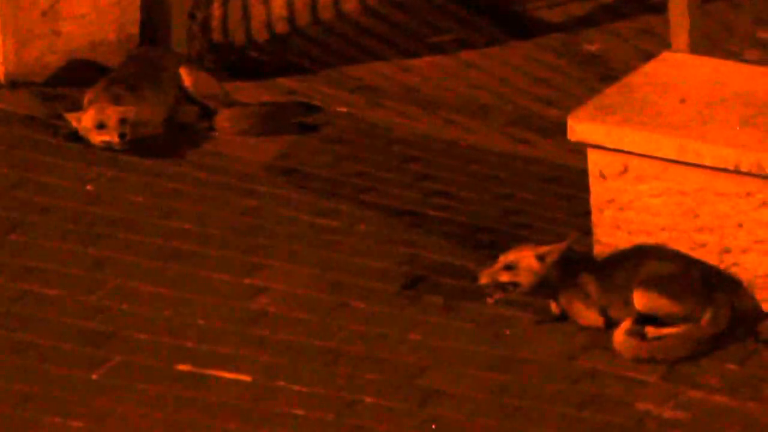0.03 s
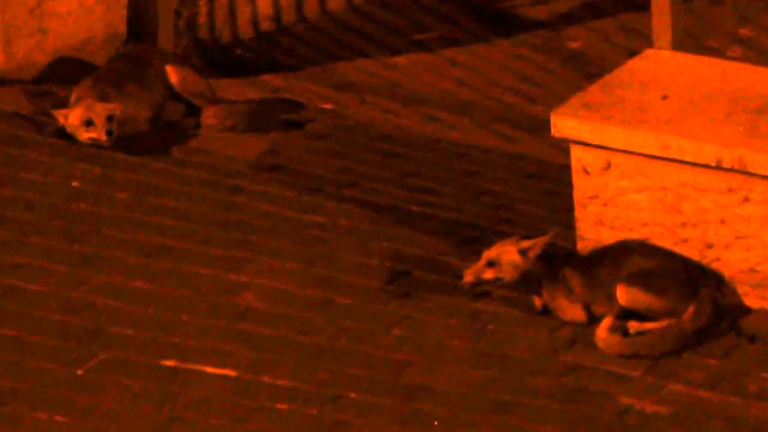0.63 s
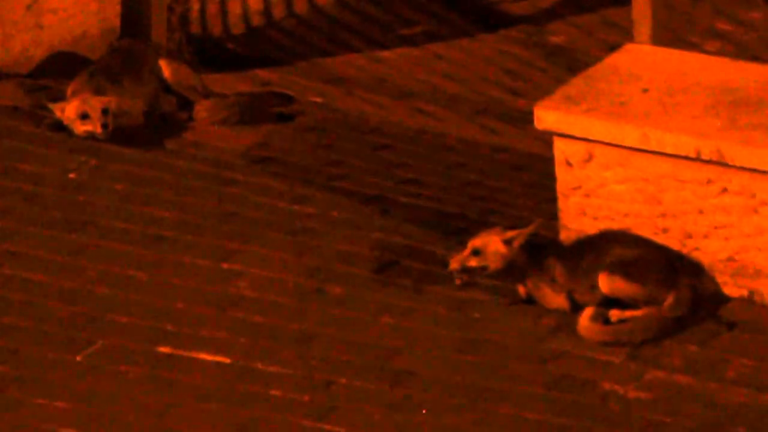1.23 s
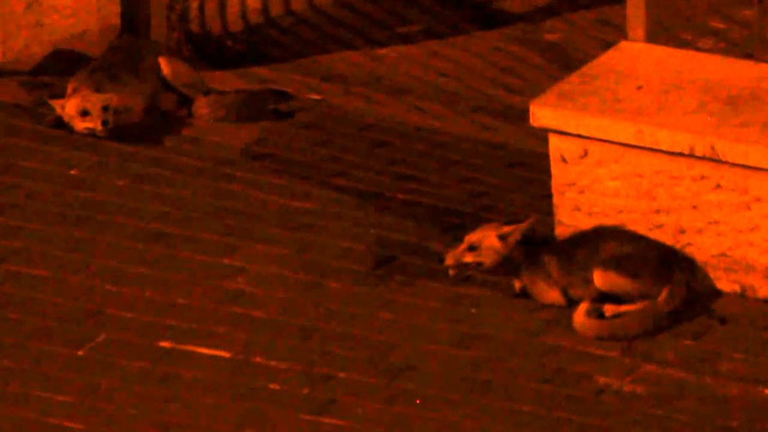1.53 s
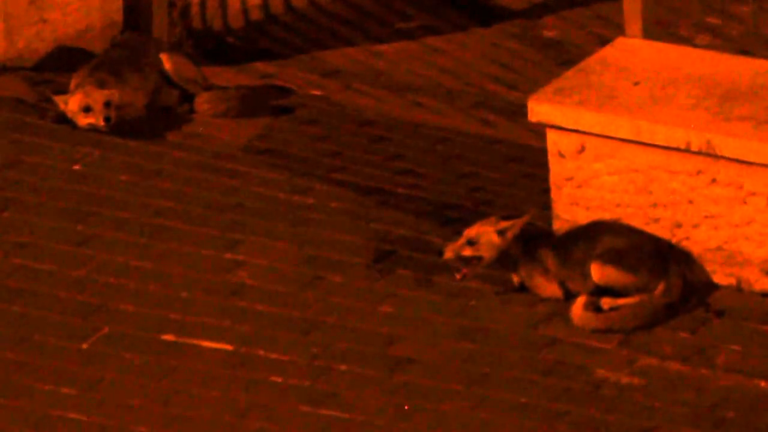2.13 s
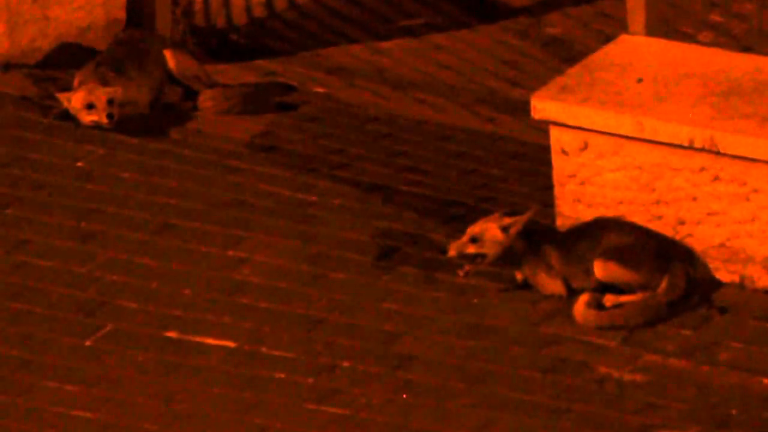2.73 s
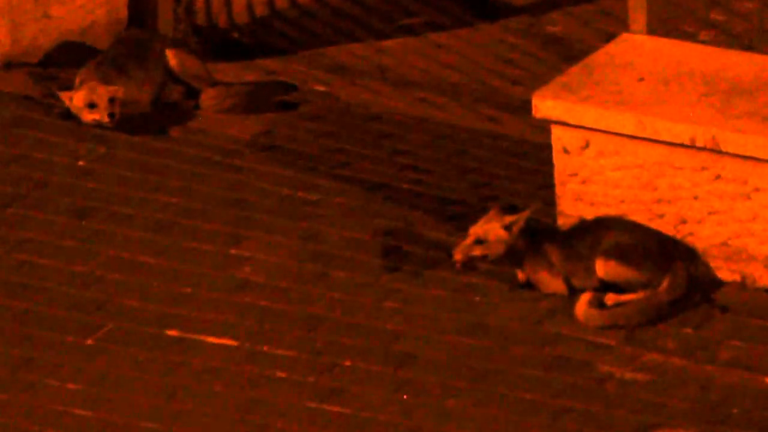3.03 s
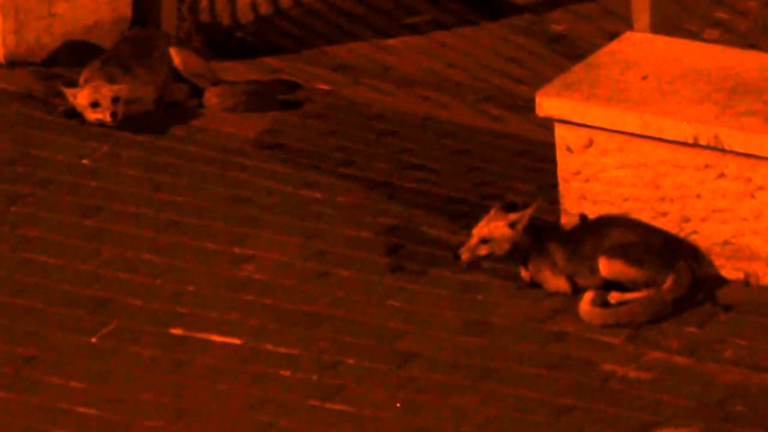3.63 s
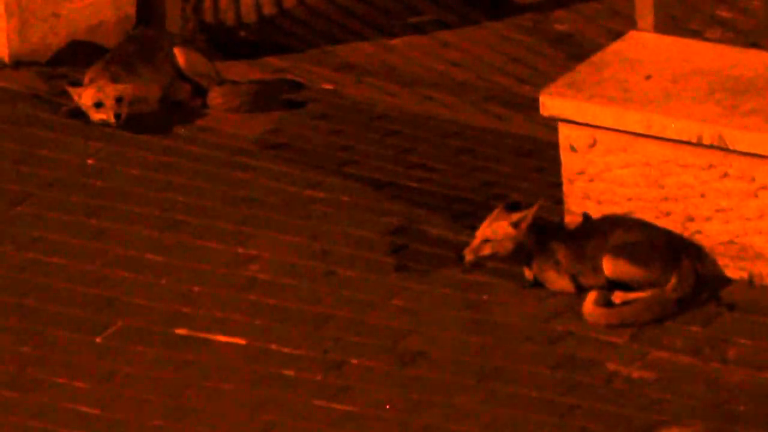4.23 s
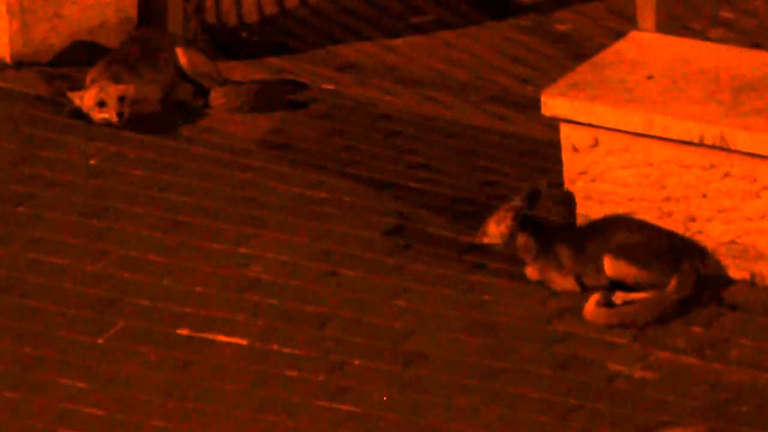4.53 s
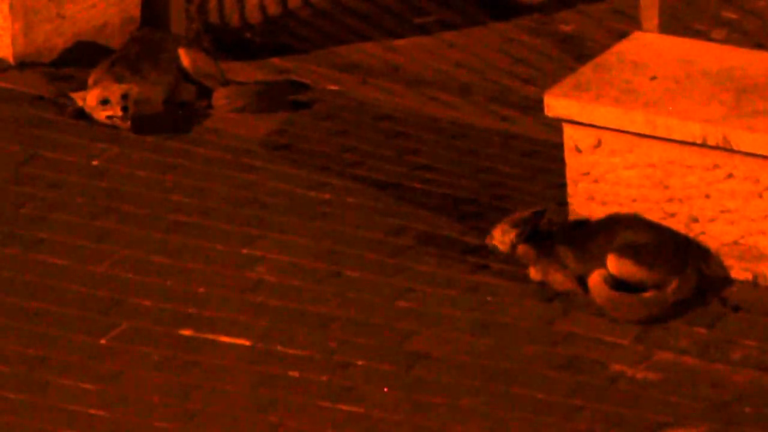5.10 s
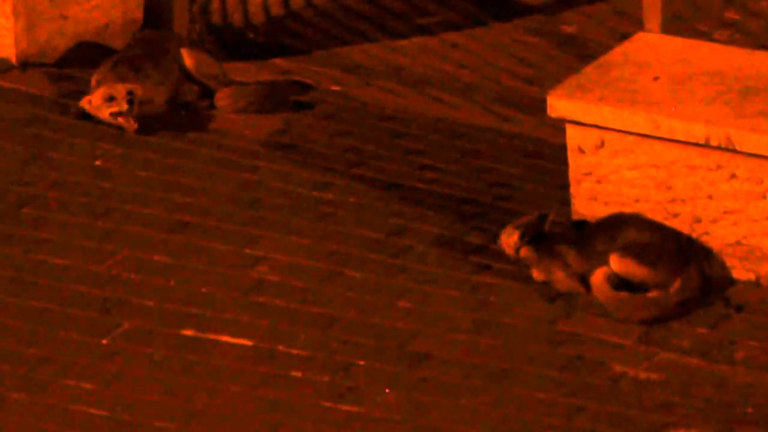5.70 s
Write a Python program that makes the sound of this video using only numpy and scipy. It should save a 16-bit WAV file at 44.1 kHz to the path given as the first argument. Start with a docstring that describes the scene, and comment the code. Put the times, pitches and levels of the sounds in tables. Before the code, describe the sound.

Harsh, high fox cries ring off yard walls, moving from squawks and yelps to whines and screams above a distant rumble.

```python
"""Two foxes squabble on a paved yard at night, over a low town rumble and a thin electronic whistle.
Short, high, arching cries ring off the walls: first squawks, torn into a two-toned rasp by a second
oscillator in the voice, and yelps that flutter at the top. A faint moan drifts in from further off,
and at 2 s a long snarl swells three times. After 3 s dry ticks on the paving fall among thinner whines.
From about 4.8 s the quarrel peaks in five open-mouthed screams."""
import sys
import numpy as np
from scipy import signal
from scipy.fft import rfft, irfft, next_fast_len
from scipy.io import wavfile
from scipy.ndimage import uniform_filter1d

SR = 44100
rng = np.random.default_rng(int(sys.argv[2]) if len(sys.argv) > 2 else 0)


def transcribe(u):
    """Save the signal u as a 16-bit wav file named by the first command-line argument.

    u: samples, shape (n,) or (channels, n), limited to [-1, 1]; the rate is SR.
    q: integer samples, one column per channel.
    """
    v = np.clip(np.atleast_2d(u).T, -1, 1)
    q = np.round(v * 32767).astype(np.int16)
    wavfile.write(sys.argv[1], SR, q)


N = 258426
BAND_LIMIT_HZ = 15950


def gain_of(db):
    """Decibels to amplitude."""
    return 10 ** (np.asarray(db) / 20)


def unit_rms(x):
    """Scales to rms 1."""
    return x / np.sqrt(np.mean(x ** 2) + 1e-20)


def curve_at(curve, hz):
    """Reads a curve on a log-frequency axis."""
    f, value = np.transpose(curve)
    return np.interp(np.log(hz + 1), np.log(f + 1), value)


def add(mix, start_s, sound):
    """Lays a sound into the mix."""
    part = mix[max(round(start_s * SR), 0):][:len(sound)]
    part += sound[:len(part)]


def eq(x, curve):
    """Filters by an EQ curve."""
    size = next_fast_len(len(x) + 2048)
    gain = gain_of(curve_at(curve, np.fft.rfftfreq(size, 1 / SR)))
    return irfft(rfft(x, size) * gain, size)[:len(x)]


def stack_eq(first, second):
    """Two EQ curves in series, as one."""
    corners = sorted(hz for hz, _ in first + second)
    return [(hz, curve_at(first, hz) + curve_at(second, hz)) for hz in corners]


def wander(size, hz):
    """Smooth random modulation of rms 1, rolling off above hz."""
    f = np.fft.rfftfreq(size, 1 / SR)
    return unit_rms(irfft(rfft(rng.standard_normal(size)) * (f > 0) / (1 + (f / hz) ** 4), size))


def gate(t, start, end, ramp_s=0.0056):
    """1 between start and end, with a ramp centred on each."""
    return np.clip(np.minimum(t - start, end - t) / ramp_s + .5, 0, 1)


# Tone of the distant town: (frequency [Hz], gain [dB])
TOWN_EQ = [(10, -70), (25, -50), (50, -20), (75, -11.5), (100, -4), (135, -7.5), (190, -2.5), (260, -6.5),
           (370, -2.5), (600, -9), (1200, -7.5), (2300, -15.5), (5000, -18.5), (8000, -32), (15000, -36.5)]

def town(rumble_db=-41, hum_hz=95.7, hum_db=-55):
    """The bed: an even, far rumble with a wavering low hum."""
    rumble = unit_rms(eq(rng.standard_normal(N), TOWN_EQ))
    pitch = hum_hz + 3.24 * wander(N, 5.1)
    hum = np.sin(2 * np.pi * np.cumsum(pitch) / SR) * (1 + 0.22 * wander(N, 3.2))
    return gain_of(rumble_db) * rumble + gain_of(hum_db) * unit_rms(hum)


def arch(crest, rise_s, fall_s, top_hz, level_db, mouth_hz, bright_db, *,
         rise_sag, rise_power, fall_sag, fall_power, start_db, end_db, dull_db, closing_per_s, attack_s):
    """One cry's envelopes: pitch sags either side of the crest, and the mouth closes as it goes."""
    start = crest - rise_s
    t = np.arange(max(start, 0), crest + fall_s, 1 / SR)
    before, after = np.maximum(crest - t, 0) / rise_s, np.maximum(t - crest, 0) / fall_s
    early, late = before ** rise_power, after ** fall_power
    tension = 1 - rise_sag * early - fall_sag * late
    attack_db = 20 * np.log10(np.clip((t - start) / attack_s, 1e-3, 1))
    level = level_db + attack_db + start_db * early + end_db * late
    mouth = mouth_hz * tension ** 0.64 * np.exp(-closing_per_s * (t - crest))
    brightness = bright_db + dull_db * (before ** 4 + 0.45 * late)
    return t, top_hz * tension, level, mouth, brightness


def flutter(t, crest, depth, rate_hz=81.4, lead_s=0.0274, hold_s=0.043, fade_s=0.018, slowing_s=.08):
    """How far the voice is choked (0-1): even throbs up to the crest, then slower and fading."""
    age = t - crest
    turns = rate_hz * np.where(age < 0, age, slowing_s * (1 - np.exp(-np.abs(age) / slowing_s)))
    fade_in = np.clip((age + lead_s) / 0.0029 + .5, 0, 1)
    fade_out = np.clip((hold_s - age) / fade_s + .5, 0, 1)
    return depth * fade_in * fade_out * np.sin(np.pi * turns) ** 2


def vocal_folds(hz, bright_db, rasp, chaos):
    """Twelve harmonics, shaken by a second oscillator: locked at two turns to five, slipping in chaos."""
    phase = 2 * np.pi * np.cumsum(hz) / SR
    folds = sum(gain_of(bright_db * np.log2(k / 2)) * (k * hz < BAND_LIMIT_HZ)
                * np.cos(k * phase + k ** 2) for k in range(1, 13))
    second = phase * 2 / 5 + 2 * chaos * wander(len(hz), 364)
    return unit_rms(folds * (1 + rasp * (np.cos(second) + .22 * np.cos(2 * second))))


def formants(x, throat, mouth_hz, mouth_pull):
    """The jaws slide all the throat's resonances together, the strongest part way to mouth_hz."""
    rest_hz = max(throat, key=lambda point: point[1])[0]
    hz, age, spectra = signal.stft(x, SR, nperseg=256, noverlap=192)
    slide = np.interp(age, np.arange(len(x)) / SR, (mouth_hz / rest_hz) ** mouth_pull)
    gain = gain_of(curve_at(throat, hz[:, None] / slide))
    return signal.istft(spectra * gain, SR, nperseg=256, noverlap=192)[1][:len(x)]


# A small head, with no bass and dips in the treble: (frequency [Hz], gain [dB])
HEAD_EQ = [(60, -40), (300, -3), (800, 2), (6000, 0), (7700, -9), (9600, -0.5), (11800, -8), (13500, -6.5),
           (15500, -5)]

def cry(t, hz, level_db, mouth_hz, bright_db, throat, choke, rasp=0, chaos=0, mouth_pull=0.81):
    """The fox's voice: folds and breath through the throat, chopped by flutter. Gives (start, sound)."""
    size = len(t)
    choke, chaos = np.clip(choke, 0, 1), np.clip(chaos, 0, 1)
    # each throb is a small, unsteady arch of pitch, and the fluttering voice is duller
    tightness = uniform_filter1d(choke, size=520)
    bend = 0.091 * (tightness - choke)
    jitter = (0.0055 + 0.071 * tightness + .055 * chaos ** 2) * wander(size, 300)
    hz = uniform_filter1d(hz, size=500, mode="nearest") * (1 + bend + jitter)
    bright_db = np.clip(bright_db, -12, 7) - 4 * tightness
    folds = vocal_folds(hz, bright_db, rasp, chaos)
    breath = (gain_of(-29) + chaos ** 2 * gain_of(-11)) * rng.standard_normal(size)
    voice = eq(formants(folds + breath, throat, mouth_hz, mouth_pull), HEAD_EQ)
    voice /= np.sqrt(uniform_filter1d(voice ** 2, size=400) + 1e-12)
    # the flutter packs the same power into short bursts
    throb = (1 - choke) ** 1.8
    throb /= np.sqrt(uniform_filter1d(throb ** 2, size=560) + 1e-6)
    shudder = gain_of((1.3 + .6 * chaos) * np.tanh(wander(size, 160)))
    fades = gate(t, t[0] + .002, t[-1] - .002, ramp_s=.004)
    return t[0], gain_of(level_db) * voice * throb * shudder * fades


# Throat formants behind squawks, yelps and snarl: (frequency [Hz], gain [dB])
FOX_THROAT = [(400, -56), (950, -31.5), (1500, -3), (2200, -15.5), (2900, -8), (3700, 3.5), (4150, -5),
              (4750, -11.5), (5400, -17.5), (7000, -23), (10000, -30.5), (15500, -37)]
# A squawk's narrower ring on top of them: (frequency [Hz], gain [dB])
SQUAWK_EQ = [(1500, -1.5), (2600, 0.5), (3450, 3), (4000, 0.5), (4800, 3.5), (5800, -1.5), (7300, -4),
             (9500, 1)]
# Squawk cues: (crest [s], rise [s], fall [s], top pitch [Hz], level [dB], mouth target [Hz],
# brightness [dB/octave], flutter [0-1], rasp lead before crest [s], rasp length [s], rasp depth,
# chaos [0-1])
SQUAWK_CUES = [ (.012, 0.064, 0.064, 1905, -21.5, 4070, 0, 0.58, 0.042, 0.1, 1.13, 0.97),
               (0.687, 0.06, 0.084, 1590, -21.5, 3770, 2, 0.07, 0.012, 0.067, 1.8, 0.13),
               (.854, 0.049, 0.09, 1589, -21.5, 3780, 3, 0, 0.002, 0.064, 2.2, 0.13),
               (1.058, 0.064, 0.077, 1586, -21, 3760, 3, 0, 0.014, 0.065, 2, 0.15),
               (2.57, .052, .065, 1697, -22, 3660, 3, 0.42, 0.0394, 0.048, 1.7, 0.42),
               (4.455, .054, 0.029, 1736, -21.5, 3800, 3.5, 0.34, 0.028, 0.046, 2.5, 0.49), ]

def squawks(rasp_db=4, rasp_fade_db=0.5, rasp_db_per_octave=-3.5):
    """Arches whose middle snaps into a louder, duller two-toned rasp that eases off a touch."""
    throat = stack_eq(FOX_THROAT, SQUAWK_EQ)
    for crest, *form, depth, lead_s, rasp_s, rasp, chaos in SQUAWK_CUES:
        t, hz, level_db, mouth_hz, bright_db = arch(
            crest, *form, rise_sag=.2, rise_power=2, fall_sag=.2, fall_power=1.8,
            start_db=-6, end_db=-7.5, dull_db=0, closing_per_s=1.1, attack_s=0.0074)
        rasp_start = crest - lead_s
        on = gate(t, rasp_start, rasp_start + rasp_s)
        level_db += on * (rasp_db - rasp_fade_db * ((t - rasp_start) / rasp_s - .5))
        bright_db += on * rasp_db_per_octave
        choke = flutter(t, crest, depth)
        yield cry(t, hz, level_db, mouth_hz, bright_db, throat, choke, rasp * on, chaos * on)


# Early reflections off the near walls: (delay [s], gain [dB])
NEAR_ECHOES = [(.0171, -25), (.0207, -16.5), (.0244, -29.5), (.0296, -14)]
# Slapback off the far walls: (delay [s], gain [dB])
FAR_ECHOES = [(.108, -13.5), (.1765, -18)]
# Tone of the slapback: (frequency [Hz], gain [dB])
FAR_EQ = [(700, -9), (1400, 14), (1900, -7), (2800, 3.5), (5000, -36), (12000, 3.5)]
# Reverb decay: (frequency [Hz], time to fall 60 dB [s])
TAIL_T60 = [(500, 0.17), (1500, 1.75), (3500, 1.42), (6000, 0.8), (10000, 0.18), (15000, 0.13)]
# Tone of the reverb: (frequency [Hz], gain [dB])
TAIL_EQ = [(500, 30), (1450, 0.5), (2200, 2.5), (3500, -5), (6000, 9), (10000, 13), (15000, 8)]

def yard(x, tail_db=-10.5, build_s=0.0013):
    """The walls throw back single echoes and a diffuse tail that rings longest in the mids."""
    t = np.arange(int(1.4 * SR)) / SR
    taps = rng.standard_normal(len(t)) * (rng.random(len(t)) < .15) * (1 - np.exp(-t / build_s))
    hz, age, spectra = signal.stft(taps, SR, nperseg=256)
    decay = gain_of(-60 * age / curve_at(TAIL_T60, hz)[:, None])
    tail = signal.istft(spectra * decay, SR, nperseg=256)[1]
    tail = eq(tail / np.linalg.norm(tail), TAIL_EQ)
    wet = gain_of(tail_db) * signal.fftconvolve(x, tail)[:N]
    for echoes, sound in ((NEAR_ECHOES, x), (FAR_ECHOES, eq(x, FAR_EQ))):
        for delay, db in echoes:
            add(wet, delay, gain_of(db) * sound)
    return wet


# Yelp cues: (crest [s], rise [s], fall [s], top pitch [Hz], level [dB], mouth target [Hz],
# brightness [dB/octave], flutter rate [Hz], flutter [0-1])
YELP_CUES = [ (.493, 0.041, 0.07, 1707, -23, 3530, 2.5, 90, .85),
             (1.375, .046, 0.068, 1956, -17, 3920, 2.5, 88.5, 0.94),
             (1.857, .043, .073, 1866, -20.5, 3860, 2.5, 90, 0.97),
             (2.9123, 0.045, 0.074, 1861, -21, 3970, 2, 85.5, 0.9), ]

def yelps():
    """Clean arches that chop into a deep flutter at the crest."""
    for crest, *form, rate_hz, depth in YELP_CUES:
        t, *envelopes = arch(
            crest, *form, rise_sag=.2, rise_power=1.9, fall_sag=0.34, fall_power=1.2,
            start_db=-5, end_db=-13.5, dull_db=-1.5, closing_per_s=0.16, attack_s=0.0044)
        yield cry(t, *envelopes, FOX_THROAT, flutter(t, crest, depth, rate_hz))


# Moan cues: (start [s], length [s], pitch [Hz], level before trim [dB])
MOAN_CUES = [(1.417, 0.16, 615, -64), (2.58, .42, 584.4, -62.5), (3.282, .59, 589, -65.5)]

def moans(trim_db=1.0, sway=0.0373, quaver=0.018):
    """Faint low moans further off, each a nearly pure, wavering tone."""
    track = np.zeros(N)
    for start, length, hz, db in MOAN_CUES:
        size = int(length * SR)
        pitch = hz * (1 + sway * wander(size, 6.25) + quaver * wander(size, 27))
        tone = unit_rms(np.sin(2 * np.pi * np.cumsum(pitch) / SR))
        add(track, start, gain_of(db + trim_db) * tone * signal.windows.tukey(size, .3))
    return track


# Snarl automation: (time [s], pitch [Hz], level [dB], mouth target [Hz])
SNARL_CURVES = [(1.958, 1334, -33, 3280), (1.976, 1488, -24, 3440), (2.018, 1740, -17, 3550),
                (2.058, 1670, -23.5, 3500), (2.09, 1445, -19.5, 3470), (2.124, 1434, -19, 3500),
                (2.204, 1740, -19.5, 3600), (2.25, 1632, -21.5, 3420), (2.27, 1499, -19.5, 3580),
                (2.316, 1463, -18.5, 3610), (2.404, 1791, -19.5, 3620), (2.434, 1772, -17, 3630),
                (2.446, 1550, -25, 3567), (2.49, 1373, -26, 3210)]
# Its three swells: (crest [s], rasp lead before crest [s], flutter [0-1], rasp depth, chaos [0-1])
SNARL_SWELLS = [(2.028, 0.037, 0.6, 2.6, .4), (2.201, 0.13, 0.51, 2.9, 0.14),
                (2.402, 0.1463, 0.46, 2.43, 0.25)]
# A tight jaw mutes the top resonances: (frequency [Hz], gain [dB])
JAW_EQ = [(1500, 0), (3800, 0), (4500, 1.5), (5500, -2.5), (8000, -1)]

def snarl(bright_db=3, rasp_db_per_octave=-4.0, let_go_s=0.021):
    """One long cry: each swell rasps on the way up, lets go and flutters at the top."""
    times, *columns = np.transpose(SNARL_CURVES)
    t = np.arange(times[0], times[-1], 1 / SR)
    envelopes = [np.interp(t, times, column) for column in columns]
    choke, dulling, rasp, chaos = np.zeros((4, len(t)))
    for crest, lead_s, depth, swell_rasp, swell_chaos in SNARL_SWELLS:
        on = gate(t, crest - lead_s, crest - let_go_s)
        choke += flutter(t, crest, depth, rate_hz=101.2)
        dulling += rasp_db_per_octave * on
        rasp += swell_rasp * on
        chaos += swell_chaos * on
    yield cry(t, *envelopes, bright_db + dulling, stack_eq(FOX_THROAT, JAW_EQ), choke, rasp, chaos)


# Tick cues: (time [s], level before trim [dB])
TICK_CUES = [(3.194, -33.5), (3.8394, -38), (3.9065, -41), (4.0524, -34), (4.087, -37), (4.1298, -31.5)]

def ticks(trim_db=-2, ring_hz=3250, decay_s=0.0045):
    """Small dry ticks on the paving, each a puff of noise in one resonance."""
    track, t = np.zeros(N), np.arange(1500) / SR
    resonance = signal.iirpeak(ring_hz, Q=7, fs=SR)
    for start, db in TICK_CUES:
        ring = unit_rms(signal.lfilter(*resonance, rng.standard_normal(len(t))))
        add(track, start, gain_of(db + trim_db) * ring * np.exp(-t / decay_s))
    return track


# Formants of a narrowed throat: (frequency [Hz], gain [dB])
NARROW_THROAT = [(400, -40), (1000, -30), (1500, -7.5), (2300, -15.5), (2900, -5.5), (3500, -6),
                 (4350, -2.5), (5000, -6.5), (5800, -12.5), (7000, -25.5), (10000, -34), (15500, -33.5)]
# Whine cues: (crest [s], rise [s], fall [s], top pitch [Hz], level [dB], mouth target [Hz],
# brightness [dB/octave], flutter [0-1], rise sag [0-1], fall sag [0-1], arch flatness [exponent])
WHINE_CUES = [ (3.315, 0.042, 0.072, 1620, -25, 3740, 2, 0.47, 0.2, 0.31, 1.72),
              (3.487, 0.039, 0.069, 1422, -23, 4160, 2.5, 0.05, .12, 0.21, 2.23),
              (3.695, .06, .085, 1458, -22.5, 3800, 3, 0, .22, .22, 3.2),
              (4.29, 0.047, 0.084, 1663, -24.5, 3750, 1, 0.43, 0.18, 0.35, 1.62), ]

def whines():
    """Thin, clean arches with a softer attack; the higher ones flutter lightly."""
    for crest, *form, depth, rise_sag, fall_sag, flatness in WHINE_CUES:
        t, *envelopes = arch(
            crest, *form, rise_sag=rise_sag, rise_power=flatness, fall_sag=fall_sag, fall_power=flatness,
            start_db=0.5, end_db=-13.5, dull_db=-7, closing_per_s=2.7, attack_s=.016)
        yield cry(t, *envelopes, NARROW_THROAT, flutter(t, crest, depth, rate_hz=112))


# Formants with the mouth wide open: (frequency [Hz], gain [dB])
SCREAM_THROAT = [(400, -72), (950, -14.5), (1600, 0.5), (2050, 2), (2650, 9), (3300, 1.5), (4400, -4),
                 (5500, -14.5), (6800, -24), (10000, -32.5), (15500, -34)]
# Scream cues: (crest [s], rise [s], fall [s], top pitch [Hz], level [dB], mouth target [Hz],
# brightness [dB/octave], flutter [0-1], onset trim [dB], rasp depth, chaos [0-1])
SCREAM_CUES = [ (4.8, .057, 0.078, 1844, -20.5, 2930, 7, 0.08, -4, 0.73, 0.99),
               (5.204, .055, 0.075, 1889, -19, 2500, 4.5, 0.35, 4.5, 1.2, 0.82),
               (5.383, 0.066, 0.074, 1692, -17.5, 2630, 2.5, 0.06, -5.5, 1.7, 0.3),
               (5.55, .06, .082, 1668, -20.5, 2860, 5.5, 0.08, -2.5, 2, 0.77),
               (5.9, 0.051, .06, 1860, -18, 3440, 5, 0.08, -2, 1.65, 0.76), ]

def screams(clean_start_s=.021, clean_end_s=0.007):
    """Open-mouthed arches, in chaotic rasp except at their two ends."""
    for crest, *form, depth, onset_db, rasp, chaos in SCREAM_CUES:
        t, hz, level_db, mouth_hz, bright_db = arch(
            crest, *form, rise_sag=.2, rise_power=2.6, fall_sag=.21, fall_power=2.1,
            start_db=-4.5, end_db=-7.5, dull_db=-14, closing_per_s=0.079, attack_s=.004)
        on = gate(t, t[0] + clean_start_s, t[-1] - clean_end_s)
        level_db += onset_db * np.interp(t, [t[0], crest], [1, 0]) ** 2
        yield cry(t, hz, level_db, mouth_hz, bright_db, SCREAM_THROAT, flutter(t, crest, depth),
                  rasp * on, chaos * on, mouth_pull=0.46)


def scene():
    """The mono mix: foxes, moans and ticks echo in the yard, with the town behind."""
    direct = moans() + ticks()
    faders_db = {yelps: -0.8, squawks: -0.88, snarl: -1, whines: -1, screams: -0.5}
    for cries, db in faders_db.items():
        for start, sound in cries():
            add(direct, start, gain_of(db) * sound)
    return (direct + yard(direct) + town())[None]


def record(dry):
    """Adds a thin, steady electronic whistle, then a steep low-pass."""
    whistle_hz, whistle_db = 15645, -49.5
    whistle = gain_of(whistle_db) * unit_rms(np.sin(2 * np.pi * whistle_hz * np.arange(N) / SR))
    lowpass = signal.firwin(1023, BAND_LIMIT_HZ, window=("kaiser", 9), fs=SR)
    return signal.oaconvolve(dry + whistle, lowpass[None], "same")


dry = scene()
out = record(dry)
transcribe(out)
```